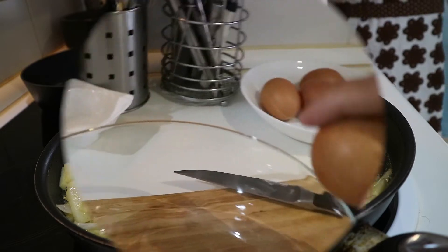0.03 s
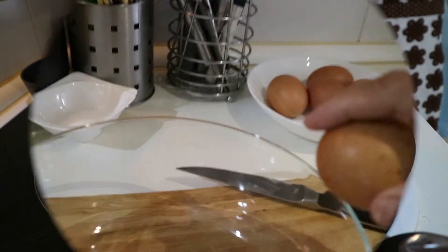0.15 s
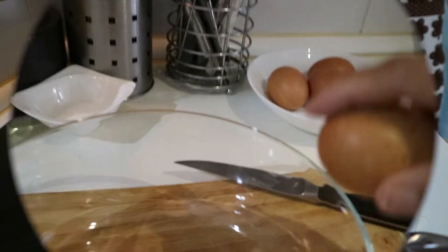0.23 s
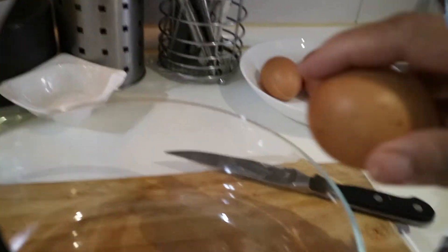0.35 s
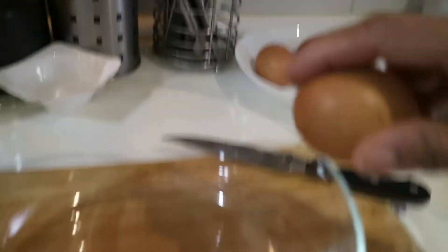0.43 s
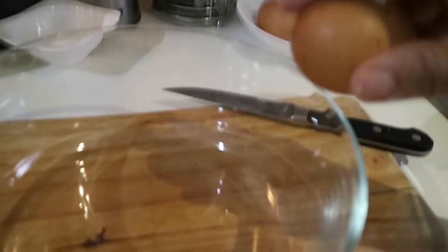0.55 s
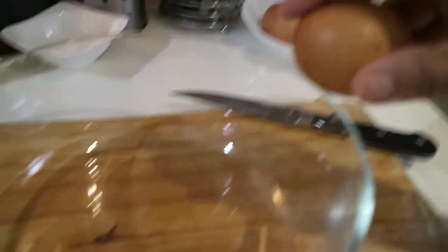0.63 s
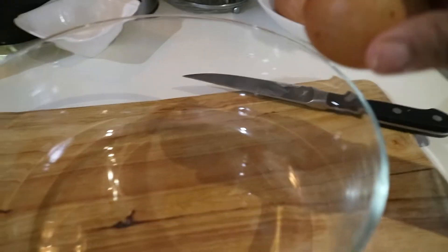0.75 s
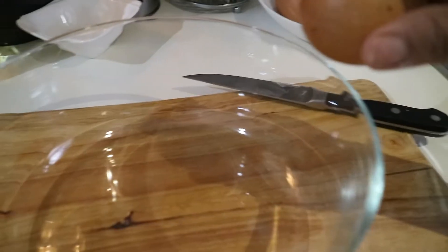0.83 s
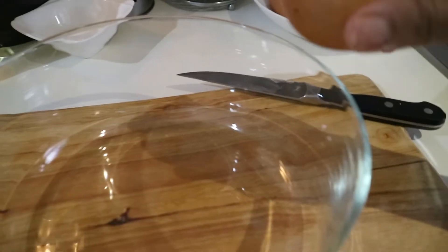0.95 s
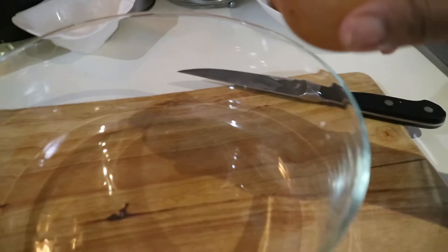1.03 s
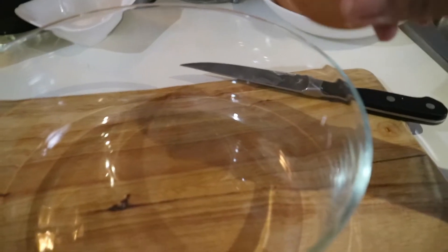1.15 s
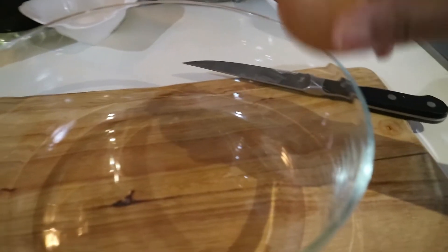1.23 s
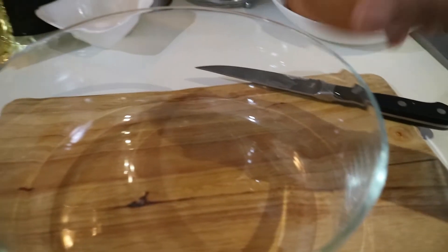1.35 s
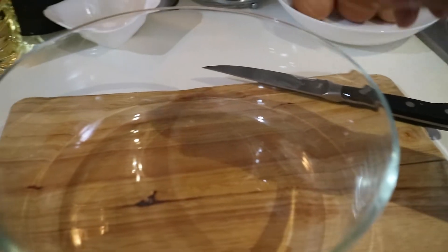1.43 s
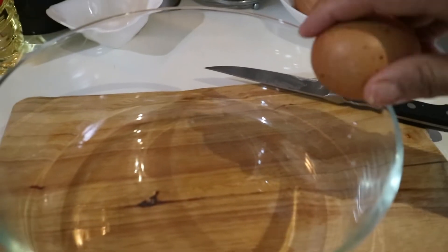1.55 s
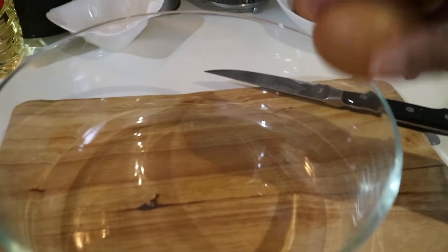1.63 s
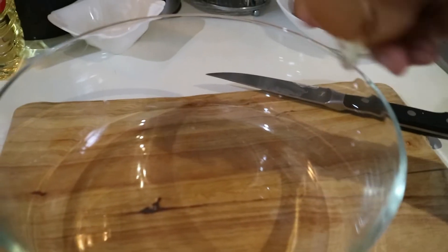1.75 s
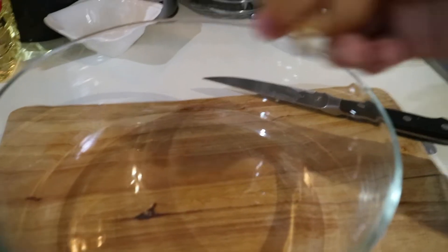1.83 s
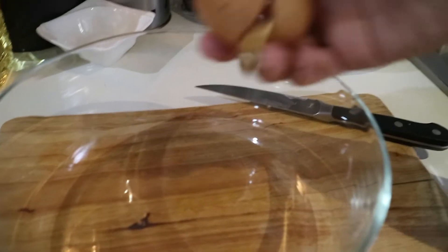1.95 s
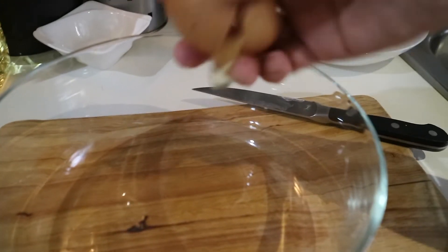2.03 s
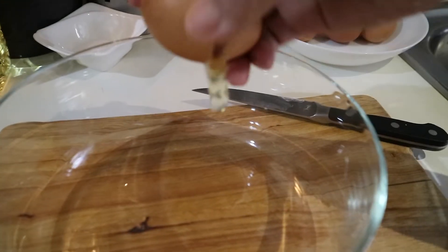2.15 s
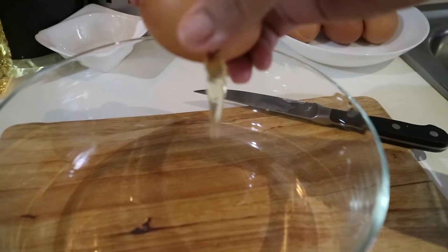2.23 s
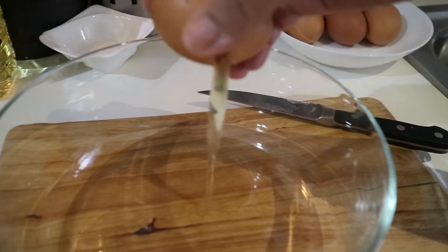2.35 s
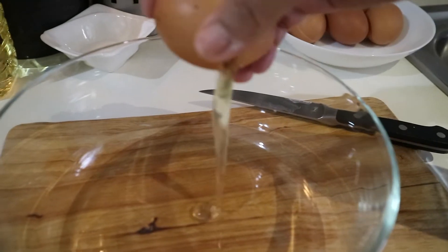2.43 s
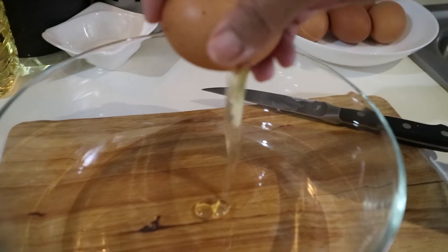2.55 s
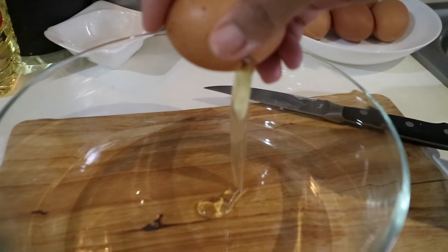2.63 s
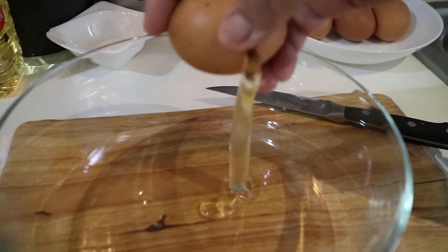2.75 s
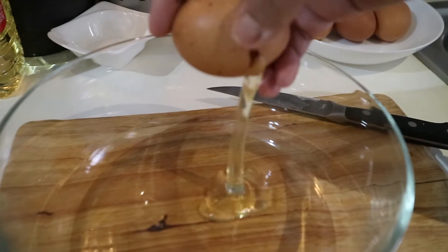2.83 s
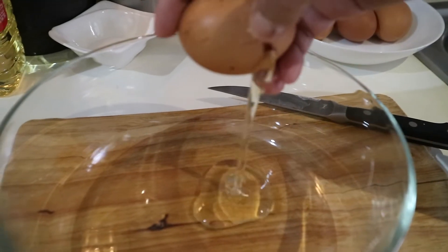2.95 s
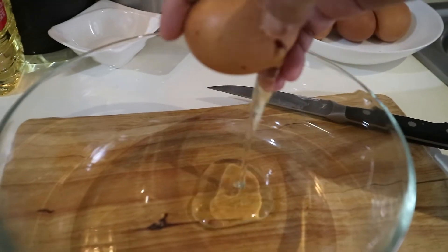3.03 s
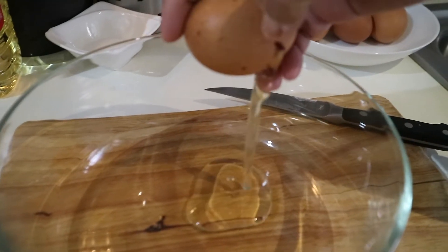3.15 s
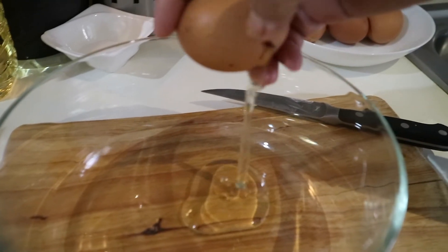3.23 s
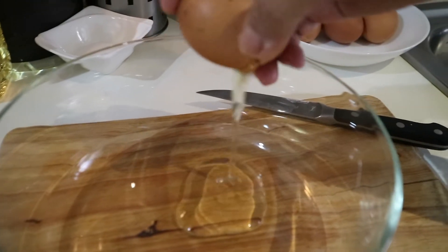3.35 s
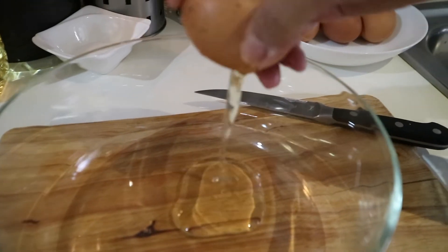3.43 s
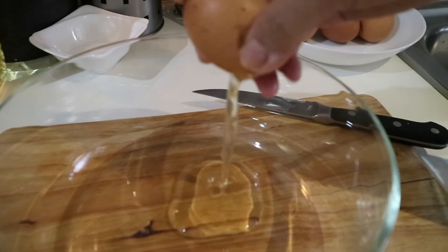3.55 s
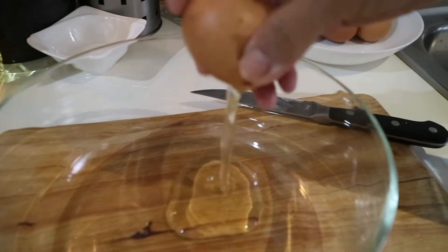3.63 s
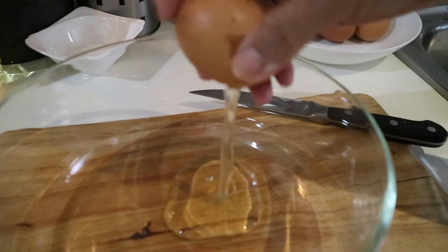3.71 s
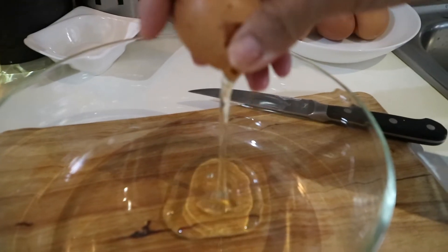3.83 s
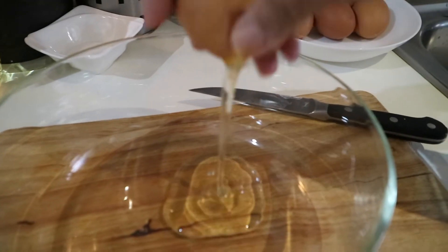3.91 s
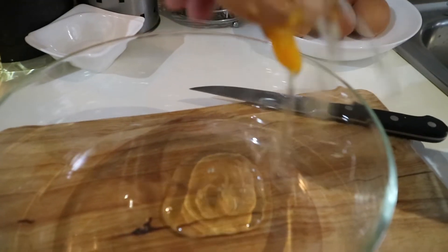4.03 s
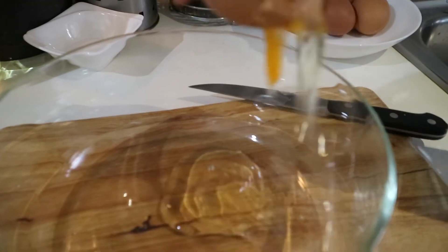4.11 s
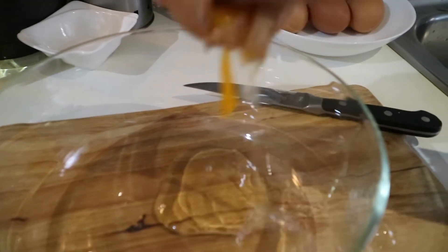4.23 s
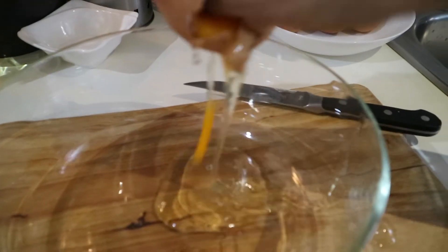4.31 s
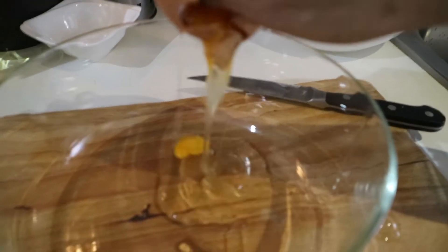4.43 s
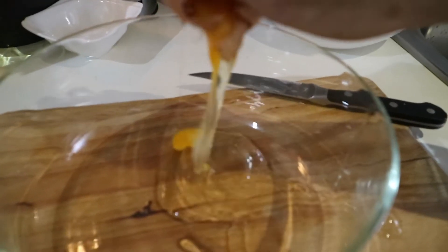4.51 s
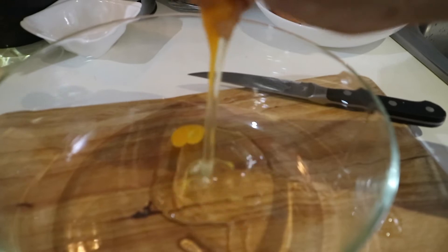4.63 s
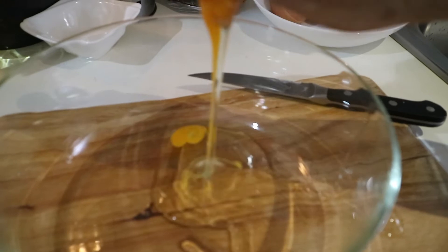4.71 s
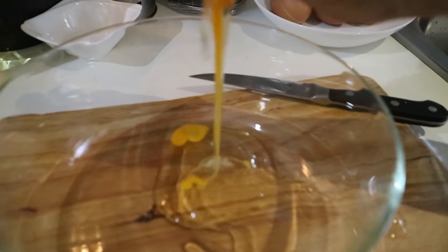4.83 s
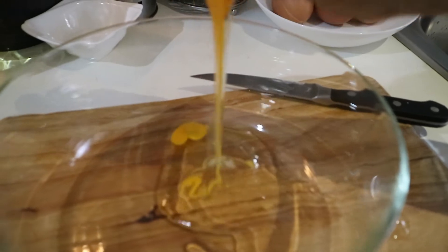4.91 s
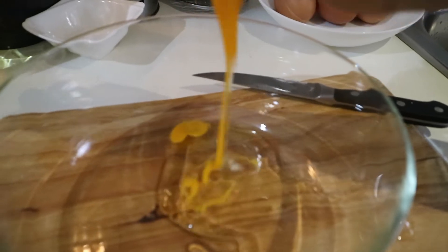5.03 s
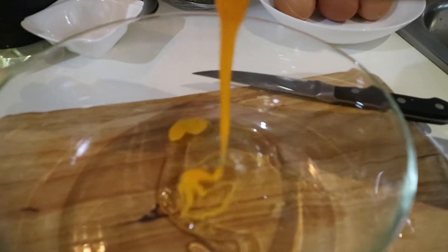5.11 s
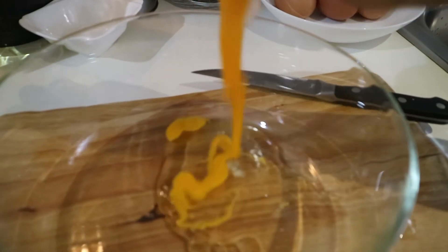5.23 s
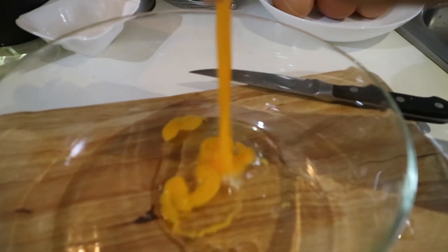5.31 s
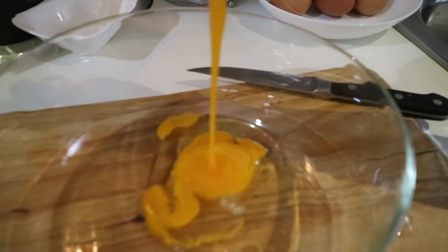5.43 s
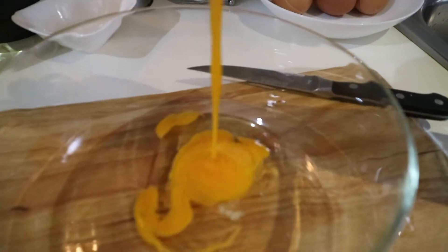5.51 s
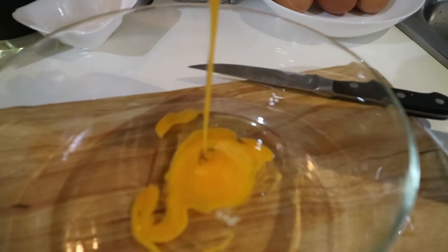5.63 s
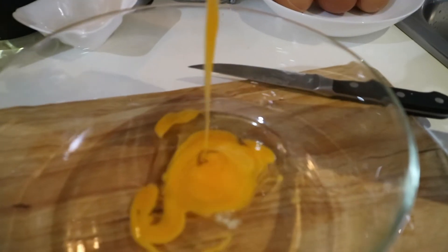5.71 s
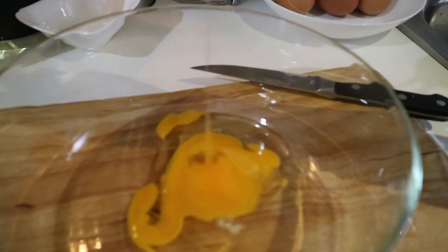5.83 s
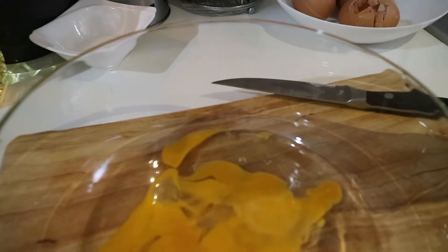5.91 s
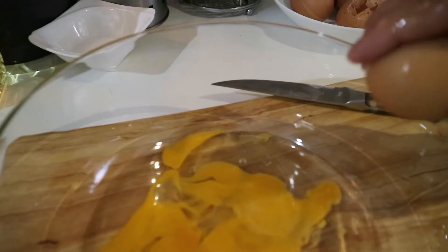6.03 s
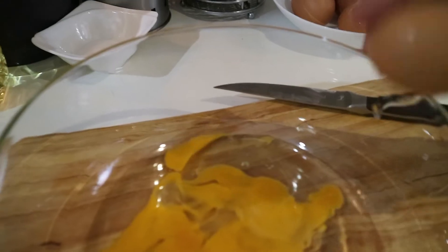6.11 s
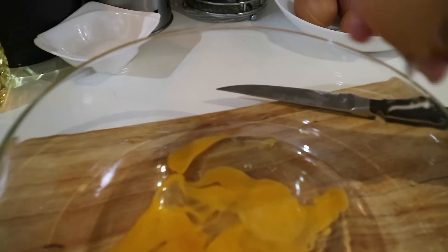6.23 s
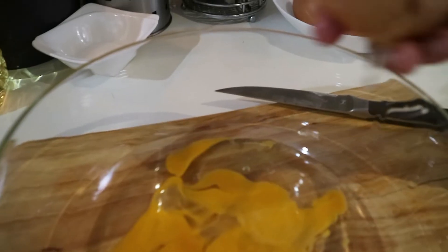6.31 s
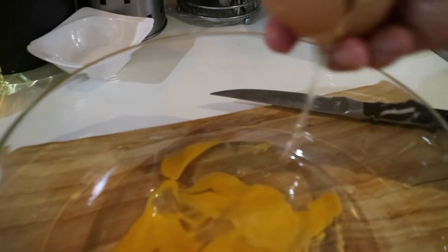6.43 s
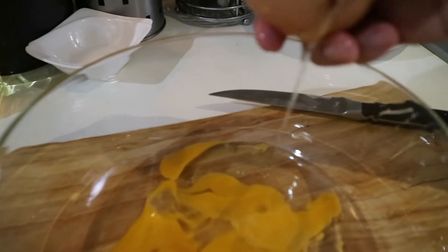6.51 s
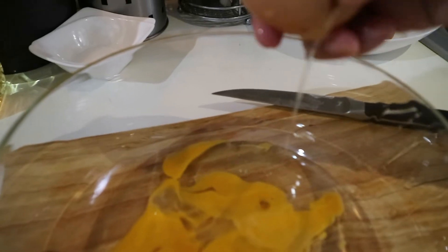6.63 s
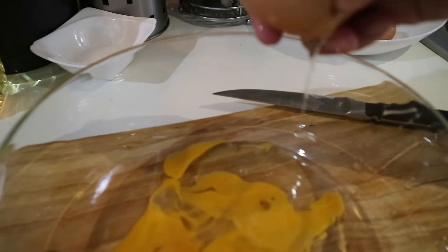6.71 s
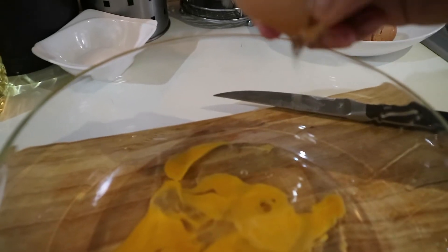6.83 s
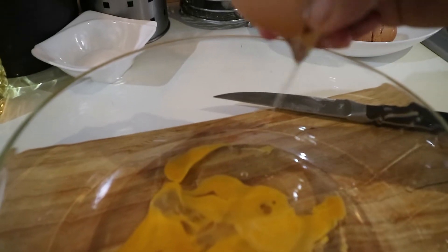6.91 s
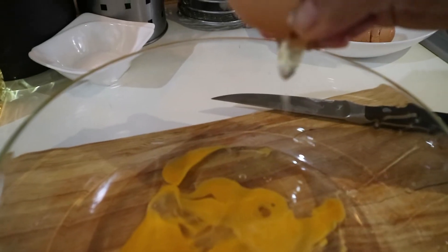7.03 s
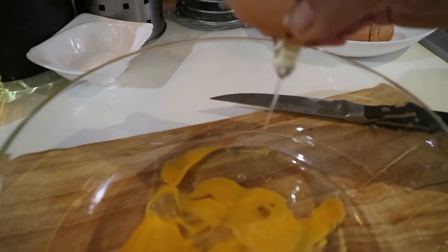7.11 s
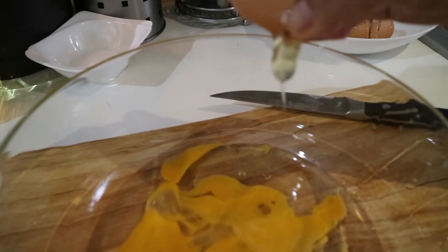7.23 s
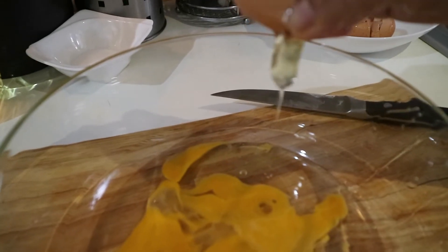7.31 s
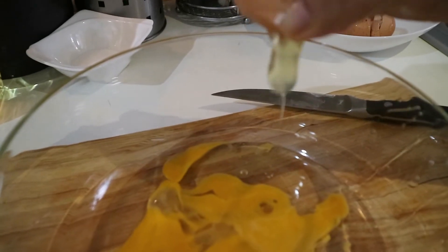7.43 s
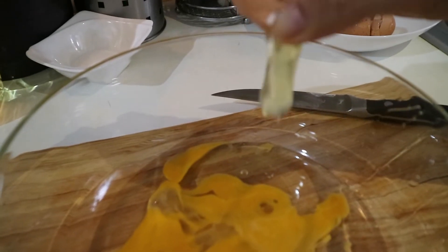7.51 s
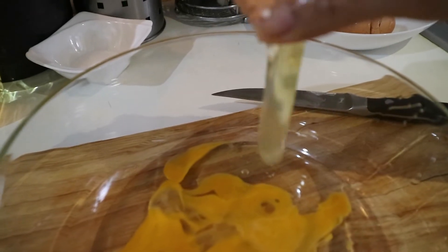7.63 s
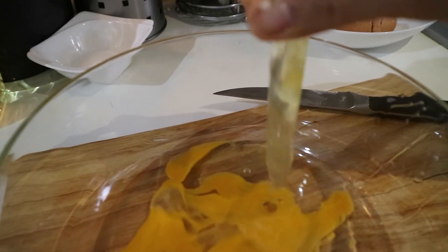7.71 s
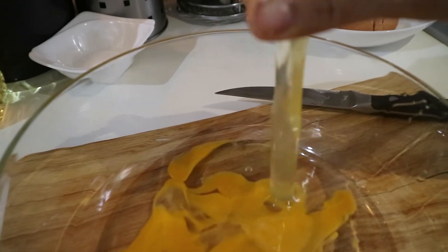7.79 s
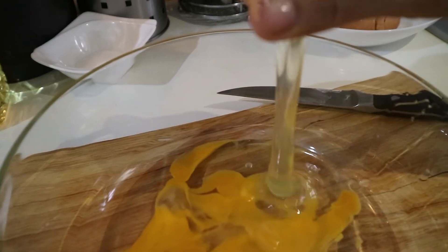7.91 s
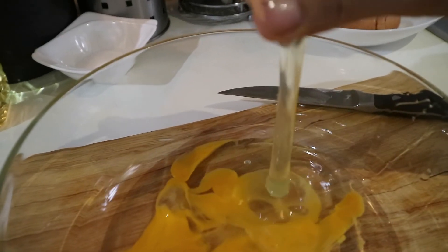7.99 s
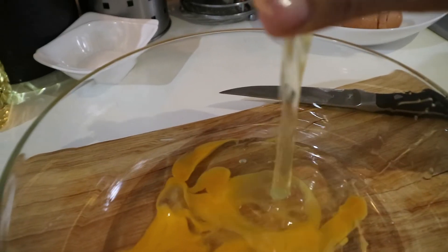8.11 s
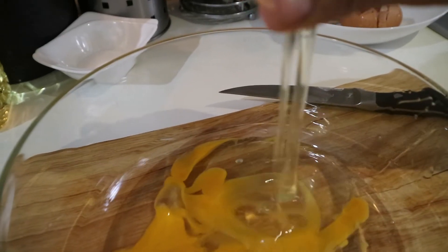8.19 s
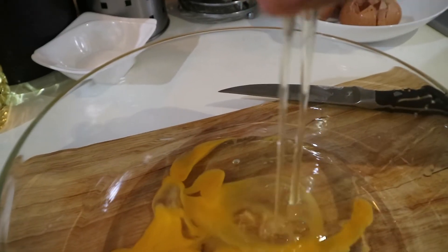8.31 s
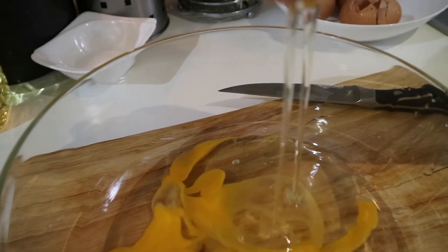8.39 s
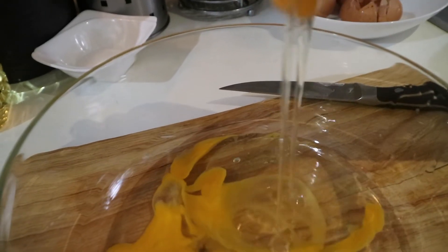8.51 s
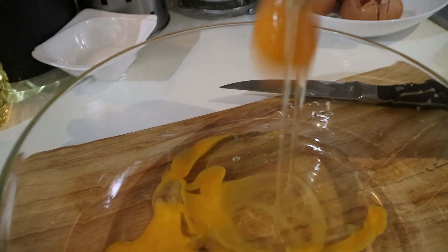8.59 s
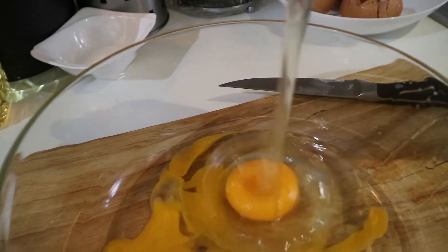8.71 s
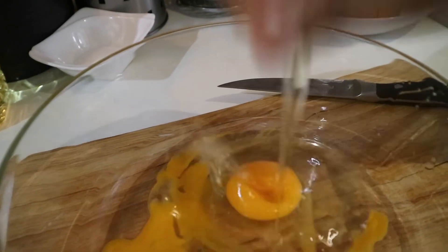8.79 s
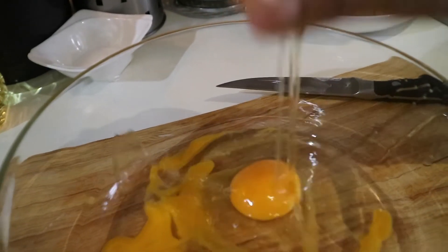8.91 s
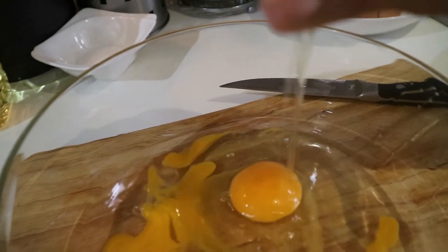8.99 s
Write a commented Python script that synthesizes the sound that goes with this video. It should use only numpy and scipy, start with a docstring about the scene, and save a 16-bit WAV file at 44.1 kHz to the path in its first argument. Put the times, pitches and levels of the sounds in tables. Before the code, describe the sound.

Potatoes bubble and spit faintly in a pan on the left, over soft kitchen room noise. Close up, after a dull knock, an egg strikes a glass bowl with a crunch and a short ring, then its shell snaps and crumbles as it is pulled apart. The bubbling thickens a little. Another egg strikes the glass, followed by a longer run of brittle shell cracks.

```python
"""A kitchen, two microphones close to a glass bowl. Further off, on the left, potatoes simmer in oil
throughout: bubbles and small spits over the steady rush of the room. After a dull knock, an egg hits
the rim at 1.6 s and the glass rings; thumbs prise the shell open, cracking and crumbling (2.7-4.6 s).
The bubbling thickens around 5 s. At 6 s a second egg hits the bowl, which rings differently with an
egg in it, and that shell is prised open in turn (6.8-8.9 s)."""
import sys
import numpy as np
from scipy import signal
from scipy.fft import rfft, irfft
from scipy.io import wavfile

SR = 44100
rng = np.random.default_rng(int(sys.argv[2]) if len(sys.argv) > 2 else 0)


def inscribe(sig):
    """Save sig as 16-bit PCM at rate SR to the path in sys.argv[1].

    A 1-D sig is mono; a 2-D sig holds one channel per row.
    Samples are clipped to [-1, 1] before scaling.
    """
    pcm = np.round(np.clip(np.atleast_2d(sig).T, -1, 1) * 32767)
    wavfile.write(sys.argv[1], SR, pcm.astype(np.int16))


N = 399413
HZ = np.maximum(np.fft.rfftfreq(N, 1 / SR), 1)

# Clear shell cracks, close up. Each row: start in seconds, level in dB, ring of the piece in Hz,
# hollow of the egg in relative dB, sharp edge in relative dB.
CLEAR_CRACKS = [(2.7478, -33, 3050, -32, -2), (2.772, -27.5, 5320, -32, -31), (3.0022, -27.5, 3450, -5, 1),
                (3.239, -39.5, 3320, -8, 0), (3.2987, -33.5, 5100, -12, -11), (3.535, -32, 2560, -15, -3),
                (3.5526, -25.5, 2900, -12, -14), (3.5644, -22.5, 2340, -14.5, -1),
                (3.7446, -26.5, 4940, -17, -15), (3.753, -36.5, 2870, -10, 1),
                (3.7745, -31, 3170, -21, -18), (3.7872, -33, 2750, -11, 0), (3.8081, -35, 2780, -16, -5),
                (3.9517, -31, 2860, -18, 1), (3.9548, -29.5, 2630, -20, -5), (3.9594, -19.5, 2540, -17, -1),
                (3.9692, -16, 3400, -21, -13), (3.9782, -22, 3290, -17, -1), (3.9883, -18, 3400, -9, -18),
                (3.9922, -24, 3000, -15, 4.5), (4.0733, -27, 3600, -37, -24),
                (4.0922, -38.5, 2440, -10, -20), (4.3606, -35.5, 2820, -11.5, -8),
                (4.645, -23, 2040, -18.5, -12.5), (6.824, -32.5, 3100, -32, -2),
                (6.8448, -30, 3300, -35, -24), (6.8585, -39, 4500, -28, -23), (6.8798, -26, 3420, -42, -34),
                (6.884, -32, 4150, -21, -24), (6.9042, -35, 2700, -7.5, -16),
                (6.976, -30.5, 4200, -27, -6.5), (7.011, -39.5, 3300, -15, -23), (7.339, -29, 3440, -8, -8),
                (7.3765, -35, 3900, -22, -27), (7.4223, -31, 3300, -13, -29),
                (7.433, -29.5, 1780, -9.5, -7), (7.4468, -29, 2620, -16, -28),
                (7.4509, -33, 2520, -25, -25), (7.4709, -23, 2580, -23, -19), (7.4757, -33, 3620, -15, -7),
                (7.544, -32.5, 2760, -23, -13), (7.5684, -37, 2420, -13, -24),
                (7.5993, -35.5, 1910, -7, -14), (7.6087, -38.5, 5000, -15, -20),
                (7.7164, -39, 3630, -14, -33), (7.772, -35, 3030, -4, -22), (7.7805, -38, 3070, -10, -25),
                (8.093, -36.5, 3500, -15, -20), (8.1081, -17.5, 4250, -16.5, -26),
                (8.1139, -21, 2900, -17, -6.5), (8.1564, -18.5, 3270, -25, -6),
                (8.174, -19.5, 3160, -18, -29), (8.1843, -15, 3300, -14.5, -19),
                (8.3239, -32, 4100, -7.5, -29), (8.358, -33.5, 2540, -27, -21),
                (8.4343, -31.5, 2940, -3.5, -10), (8.445, -25, 4560, -9, -21),
                (8.4588, -29, 3290, -11, -21), (8.4782, -22.5, 4600, -35, -12),
                (8.4958, -13, 3870, -16, -18), (8.5064, -33, 3360, -2, -10), (8.7378, -36.5, 4800, -5, -13),
                (8.8145, -30.5, 3750, -11.5, -27), (8.8851, -27, 3350, -4, -14)]
# Resonances inside the egg. Each row: pitch in Hz, nominal width in Hz.
HOLLOW_MODES = [(690, 110), (1250, 220)]


def shell_cracks():
    """A crack is a snap with a sharp edge and a crumbling tail; it rings the piece and the egg's hollow."""
    out, t = np.zeros((2, N)), np.arange(2000) / SR
    creak_samples, piece_cycles = 30, 17
    snap = np.zeros((2, len(t)))
    snap[0, creak_samples + 2] = snap[1, creak_samples] = 1   # reaches the right microphone first
    for start, level_db, hz, hollow_db, edge_db in CLEAR_CRACKS + small_cracks():
        white = 1.23 * rng.standard_normal((2, len(t))) + rng.standard_normal(len(t))
        tail = white * np.minimum(t / 0.00078, 1) * from_db(-60 * t / 0.029)
        piece = band(snap + 0.033 * tail, hz, octaves=1.79) + 0.38 * band(tail, hz, octaves=0.95)
        ring_share = 0.12 - 0.0141 * edge_db   # the duller the edge, the more the piece rings
        piece += ring_share * band(ring(snap, hz, piece_cycles / hz), hz, octaves=0.89)
        cavity = sum(ring(snap + 0.11 * tail, pitch, 1.2 / width) for pitch, width in HOLLOW_MODES)
        hollow = band(cavity, 930, octaves=1.49)
        edge = band(snap + 0.054 * tail, 7540, octaves=0.46) + 0.71 * band(snap, 10700, octaves=0.8)
        crack = piece + from_db(hollow_db) * hollow + from_db(edge_db) * edge
        add(out, start - creak_samples / 2 / SR, from_db(level_db) * crack)
    return out


# Thumbs prising the shell. Each row: start in seconds, end in seconds, small cracks per second.
PRISING_SPELLS = [(3.537, 3.594, 40), (3.991, 4.301, 15), (6.8, 7.252, 22), (7.3, 7.757, 18),
                  (8.114, 8.238, 55), (8.33, 8.621, 35)]


def small_cracks():
    """Prising scatters small cracks unevenly; returns rows like those of the clear cracks."""
    typical, spread = (-43, 2906, -10, -19), (2.5, 450, 5.0, 4.0)   # level, ring, hollow, edge
    rows = []
    for start, end, per_s in PRISING_SPELLS:
        count = int(per_s * (end - start))
        for k in range(count):
            when = start + (k + rng.random()) / count * (end - start)
            rows.append((when, *rng.normal(typical, spread)))
    return rows


# Thumbs pressing the shell, one list a squeeze. Each row: time in seconds, crackle level in dB.
SQUEEZES = [
    [(3.73, -79), (3.75, -53), (3.81, -65), (3.83, -78)],
    [(3.945, -78), (3.96, -40.5), (3.982, -42.5), (4.003, -30), (4.02, -55), (4.06, -56), (4.12, -62)],
    [(6.78, -92), (6.85, -80), (6.89, -57), (6.95, -68), (7.12, -63.5), (7.15, -68)],
    [(7.3, -64.5), (7.35, -56), (7.45, -71), (7.5, -66), (7.65, -59.5), (7.8, -63), (7.83, -66)],
    [(8.09, -65), (8.12, -49), (8.19, -73), (8.25, -77), (8.36, -57.5), (8.44, -58), (8.5, -62),
     (8.56, -74), (8.65, -64)],
]


def shell_crumble():
    """Under pressure the shell gives off dense tiny fractures."""
    times, levels_db = np.transpose(sum(SQUEEZES, []))
    level_db = np.interp(np.arange(N) / SR, times, levels_db)
    both, left, right = [grains(1200, spread_db=1, low_hz=1063, high_hz=5660, cycles=8.5) for _ in range(3)]
    fractures = both + 0.38 * np.array([left, right])
    return from_db(level_db) * rms_one(filtered(fractures, [800, 5000], "band"))


# Egg meets rim, close up. Each row: start in seconds, crunch level in dB, contact time in seconds.
RIM_BLOWS = [(1.5817, -19.5, 0.013), (6.044, -18, 0.013)]
# Spectrum of the shell giving way. Each row: frequency in Hz, relative density in dB.
CRUNCH_SPECTRUM = [(88, -59), (150, -36.5), (636, -8.5), (1510, -10), (1910, -12.5), (2230, -14),
                   (2750, -11.5), (7790, -21), (15000, -48.5)]


def rim_crunch():
    """The shell caves in for as long as it touches the rim."""
    out, t = np.zeros((2, N)), np.arange(SR) / SR
    colour = from_db(at_hz(CRUNCH_SPECTRUM, np.arange(SR // 2 + 1) + 1))
    for start, level_db, contact_s in RIM_BLOWS:
        white = rng.standard_normal((2, SR)) + 0.79 * rng.standard_normal(SR)
        crunch = rms_one(irfft(rfft(white) * colour, SR))
        contact = np.minimum(t / 0.0069, 1) * np.exp(-(t / contact_s) ** 3)
        add(out, start, from_db(level_db) * contact * crunch)
    return out


# Modes of the glass bowl. Each row: pitch in Hz, level in dB when empty, level in dB with an egg
# in it, seconds to fade by 60 dB.
GLASS_MODES = [(580, -37.5, -57, 0.47), (642, -45, -31.5, 0.18), (796, -42, -34.5, 0.2),
               (1152, -35, -37, 0.53), (1230, -32, -40, 0.25), (1300, -39, -32, 0.27),
               (1745, -51, -25, 0.5), (1900, -48, -24, 0.39), (1910, -26, -34, 0.22),
               (1925, -55, -28, 0.44), (2024, -48, -32, 0.28), (2480, -57, -39.5, 0.27),
               (2726, -39.5, -43, 0.3), (2784, -34.5, -29.5, 0.41), (3025, -51, -37.5, 0.25),
               (3828, -36, -40, 0.41), (5030, -48, -37.5, 0.43), (6530, -40.5, -43, 0.43),
               (7080, -50, -49, .28), (7560, -42, -42, 0.27), (7830, -48, -41, 0.3),
               (8270, -42.5, -45, 0.35), (8660, -48, -52, 0.44), (9460, -52, -54, 0.26),
               (9790, -46, -51, 0.18), (11160, -55, -52, 0.33), (11520, -55, -63, 0.19),
               (12680, -62, -61, 0.25)]


def glass_bowl():
    """Each blow rings the glass, loudest while the egg is on the rim, at a different phase on each side."""
    out, t = np.zeros((2, N)), np.arange(SR) / SR
    cluster = [(1, 0.65), (1.003, 0.45), (0.993, 0.24)]   # a round bowl has close modes that beat
    for eggs_inside, (start, _, contact_s) in enumerate(RIM_BLOWS):
        strike = np.minimum(t / 0.00045, 1) * (1 + 3.45 * np.exp(-(t / contact_s) ** 4))
        for hz, empty_db, filled_db, t60 in GLASS_MODES:
            level_db = filled_db if eggs_inside else empty_db
            envelope = strike * from_db(level_db - 60 * t / t60)
            for detune, share in cluster:
                phase = rng.choice([-1, 1]) * np.array([[0.77], [-0.77]]) + rng.uniform(0, 2 * np.pi)
                add(out, start, share * envelope * np.sin(2 * np.pi * hz * detune * t + phase))
    return out


# Dull knocks nearby. Each row: start in seconds, level in dB, pitch in Hz.
DULL_KNOCKS = [(0.604, -24, 331), (3.56, -38, 257), (3.962, -38, 245), (3.961, -30.5, 390),
               (3.992, -32.5, 433), (8.8, -57.5, 70)]
# The board under the bowl, rung by each blow. Each row: pitch in Hz, level in dB relative to the
# crunch, seconds to fade by 60 dB.
BOARD_MODES = [(348, -14.5, 0.15), (151, -36.5, 0.16), (91.3, -35.5, 0.3)]
# Short high rings. Each row: start in seconds, level in dB, pitch in Hz, seconds to fade by 60 dB.
HIGH_PINGS = [(6.877, -22.5, 3550, 0.022), (6.884, -41, 2670, .025), (8.746, -46, 2850, .05),
              (8.825, -35, 2570, 0.029), (8.828, -32, 2870, 0.076)]


def knocks():
    """Soft contacts set damped modes going: dull knocks, the board and high pings."""
    out, t = np.zeros((2, N)), np.arange(SR // 2) / SR
    knock_cycles, knock_rise_cycles, board_rise_cycles, ping_rise_s = 16.6, 1.76, 0.99, 0.0022
    modes = [(start, db, hz, knock_cycles / hz, knock_rise_cycles / hz) for start, db, hz in DULL_KNOCKS]
    for start, crunch_db, _ in RIM_BLOWS:
        modes += [(start, crunch_db + db, hz, t60, board_rise_cycles / hz) for hz, db, t60 in BOARD_MODES]
    modes += [(*ping, ping_rise_s) for ping in HIGH_PINGS]
    for start, level_db, hz, t60, rise_s in modes:
        envelope = np.minimum(t / rise_s, 1) ** 2 * from_db(level_db - 60 * t / t60)
        add(out, start, envelope * np.sin(2 * np.pi * hz * t + np.array([[0.7], [-0.7]])))
    return out


def knock_puff():
    """A dry puff of noise on the first knock."""
    out, t = np.zeros((2, N)), np.arange(SR // 2) / SR
    middle_s, half_s = 0.612, 0.007
    white = rng.standard_normal((2, len(t))) + rng.standard_normal(len(t))
    puff = signal.lfilter([1], [1, -0.8], white) * np.exp(-(t / half_s - 2) ** 2)
    add(out, middle_s - 2 * half_s, from_db(-33.5) * band(puff, 530, octaves=4.1))
    return out


# The loudest bubbles in the far pan. Each row: start in seconds, level in dB, pitch in Hz.
LOUD_BUBBLES = [(0.242, -41, 1590), (0.262, -42, 3740), (0.503, -38.5, 3760), (0.952, -41.5, 3350),
                (2.038, -44, 1400), (3.127, -41, 2690), (4.276, -38, 3160), (4.941, -40.5, 1960),
                (5.103, -40.5, 2020), (5.28, -42, 1400), (5.311, -39.5, 2450), (5.61, -39, 4500),
                (5.652, -38, 2030), (5.74, -41, 5500), (6.56, -40, 2830)]
# Pace of the simmer. Each row: time in seconds, chance bubbles per second.
SIMMER_RATE = [(0, 12), (0.6, 8), (2.0, 8), (4.5, 6), (5.0, 22), (5.9, 20), (6.7, 8), (9.06, 4)]


def oil_bubbles():
    """Steam bubbles burst through the oil, swelling softly and ringing some tens of cycles."""
    out, t = np.zeros((1, N)), np.arange(SR // 8) / SR
    low_hz, high_hz, ring_cycles, chance_db, tries = 1300, 5460, 48, -47.5, 270
    times = rng.uniform(0, N / SR, tries)
    heard = rng.random(tries) < np.interp(times, *np.transpose(SIMMER_RATE)) * N / SR / tries
    pitches = low_hz * (high_hz / low_hz) ** (rng.random(tries) ** 1.41)   # more big than small
    chance_bubbles = [(start, chance_db, hz) for start, hz in zip(times[heard], pitches[heard])]
    for start, level_db, hz in LOUD_BUBBLES + chance_bubbles:
        swell = np.minimum(t / 0.00076, 1) * from_db(level_db - 60 * t * hz / ring_cycles)
        tone = np.sin(2 * np.pi * hz * t * (1 + 0.73 * t))   # the pitch rises as it surfaces
        splutter = hz / 2200 * band(rng.standard_normal(len(t)), hz, octaves=0.318)   # more in small ones
        add(out, start, swell * (0.59 * tone + splutter))
    return out[0]


def oil_sizzle():
    """Tiny bubbles burst and drops spit, each at a wavering level."""
    fizz = grains(250, spread_db=3, low_hz=543.5, high_hz=3350, cycles=24)
    fizz = signal.lfilter([0.3], [1, -0.7], fizz)   # softens the treble
    spits = from_db(-14.5) * grains(88, spread_db=0, low_hz=3080, high_hz=7770, cycles=73)
    return from_db(-61.5) * (from_db(2 * drift(0.5)) * fizz + from_db(4.9 * drift(7)) * spits)


# Room tone of the kitchen. Each row: frequency in Hz, relative density in dB.
RUSH_SPECTRUM = [(12, -69), (20, -31.5), (65, -44), (93, -5), (146, -3.5), (163, -12.5), (347, -0.5),
                 (472, -2.5), (642, -3), (1090, -7.5), (1290, -10.5), (1960, -6.5), (4810, -16.5),
                 (11800, -37), (16000, -57)]


def kitchen_rush(flicker_db):
    """Steady noise whose half-octave bands each flicker a little; rms 1."""
    spectrum = rfft(rng.standard_normal(N)) * from_db(at_hz(RUSH_SPECTRUM, HZ))
    out = np.zeros(N)
    for centre in 160 * 2 ** np.arange(0, 6.5, 0.5):
        octaves_away = abs(np.log2(np.clip(HZ, 160, 10240) / centre))
        share = np.maximum(1 - 2 * octaves_away, 0)
        out += irfft(spectrum * share, N) * from_db(flicker_db * drift(4.9))
    return rms_one(out)


# Reverberation of the kitchen. Each row: frequency in Hz, seconds to fade by 60 dB.
ROOM_DECAY = [(150, 1), (600, 0.37), (2000, 0.45), (6000, 0.31), (13000, 0.25)]


def kitchen_reverb(sound):
    """Dense reflections that die band by band, different ones at each microphone."""
    t, tail = np.arange(SR // 2) / SR, 0
    for hz in 150 * 2 ** np.arange(7):
        reflections = filtered(rng.standard_normal((2, len(t))), [hz / 2 ** 0.5, hz * 2 ** 0.5], "band")
        tail += reflections * from_db(-60 * t / at_hz(ROOM_DECAY, hz))
    tail *= np.minimum(t / 0.0057, 1)
    tail /= np.sqrt(np.sum(tail ** 2) / 2)
    return signal.fftconvolve(sound, tail, axes=1)[:, :N]


# How distant sound reaches the two microphones. Each row: frequency in Hz, likeness from 0 to 1,
# lead of the left side in radians.
FAR_ARRIVAL = [(60, .85, .4), (150, .7, 1.4), (330, .72, 2.0), (700, .42, 2.0), (1300, .35, 2.6),
               (2000, .25, 2.7), (3800, .45, 3.4), (5500, .42, 3.5), (8000, .15, 4.0), (15000, .05, 4.0)]


def afar(sound, twin, left_db):
    """A far source: the right microphone gets a phase-turned share, the rest from an unrelated twin."""
    likeness = at_hz(FAR_ARRIVAL, HZ)
    lag = np.exp(-1j * at_hz(FAR_ARRIVAL, HZ, column=2))
    right = likeness * lag * rfft(sound) + np.sqrt(1 - likeness ** 2) * rfft(twin)
    return np.array([sound, irfft(right, N)]) * from_db([[left_db / 2], [-left_db / 2]])


def grains(per_s, spread_db, low_hz, high_hz, cycles):
    """Random clicks, each ringing at one of ten pitches; rms 1."""
    sizes = from_db(spread_db * np.minimum(rng.exponential(1, N), 4)) * rng.choice([-1, 1], N)
    clicks = sizes * (rng.random(N) < per_s / SR)
    pitch_index = rng.integers(0, 10, N)
    pitches = np.geomspace(low_hz, high_hz, 10)
    return rms_one(sum(ring(clicks * (pitch_index == k), hz, cycles / hz) for k, hz in enumerate(pitches)))


def ring(clicks, hz, t60):
    """A unit click sets a sine of height 1 ringing."""
    decay, step = from_db(-60 / (t60 * SR)), 2 * np.pi * hz / SR
    return signal.lfilter([0, np.sin(step)], [1, -2 * decay * np.cos(step), decay ** 2], clicks + 1e-18)


def drift(rate_hz):
    """A slow random wander, rms 1."""
    hop, settle = 40, 2000
    pole = np.exp(-2 * np.pi * rate_hz * hop / SR)
    white = rng.standard_normal(N // hop + settle + 2)
    slow = signal.lfilter([1], [1, -2 * pole, pole ** 2], white)[settle:]
    return np.interp(np.arange(N) / hop, np.arange(len(slow)), rms_one(slow))


def band(x, hz, octaves):
    """A band around a pitch, scaled to peak 1."""
    edges = np.clip(hz * 2 ** (np.array([-0.5, 0.5]) * octaves), 50, 0.45 * SR)
    passed = filtered(x, edges, "band")
    return passed / abs(passed).max()


def filtered(x, hz, kind):
    """A gentle filter."""
    return signal.sosfilt(signal.butter(2, hz, kind, fs=SR, output="sos"), x)


def at_hz(table, hz, column=1):
    """A table read on a log-frequency axis."""
    points = np.array(table)
    return np.interp(np.log(hz), np.log(points[:, 0]), points[:, column])


def from_db(db):
    """Gain of a level."""
    return 10 ** (np.asarray(db) / 20)


def rms_one(x):
    """Scaled to rms 1."""
    return x / np.sqrt(np.mean(x ** 2) + 1e-20)


def add(out, start_s, sound):
    """Mixes a sound in at a time."""
    i = round(start_s * SR)
    out[:, i:i + sound.shape[-1]] += sound[..., :N - i]


def scene():
    """Bowl and shell close to the microphones, with their room; pan and rush further off to the left."""
    glass, crunch = glass_bowl(), rim_crunch()
    taps = knocks() + knock_puff()
    shell = shell_cracks() + shell_crumble()
    pan = oil_bubbles() + oil_sizzle()
    to_room = from_db(-10) * glass + from_db(-8) * crunch + from_db(-18.5) * taps + from_db(-11.5) * shell
    room = kitchen_reverb(to_room)
    far_pan = afar(pan, kitchen_reverb(np.array([pan, pan]))[0], left_db=4.5)
    rush = from_db(-58.5) * afar(kitchen_rush(flicker_db=3), kitchen_rush(flicker_db=1.5), left_db=3)
    return glass + crunch + taps + shell + room + far_pan + rush


# Colour of the microphone pair. Each row: frequency in Hz, left over right in dB.
MIC_BALANCE = [(60, -10.5), (150, -6.5), (330, 0.5), (680, 4), (1300, 3), (2400, 1.5), (15000, 0.4)]


def record(dry):
    """The two microphones differ in colour; the deep bass is lost and the top is cut."""
    bass_cut = filtered(dry, 60, "high")
    tilt = from_db(at_hz(MIC_BALANCE, HZ) * np.array([[0.5], [-0.5]]))
    coloured = irfft(rfft(bass_cut) * tilt, N)
    return signal.sosfilt(signal.cheby2(12, 70, 16500, fs=SR, output="sos"), coloured)


dry = scene()
out = record(dry)
inscribe(out)
```